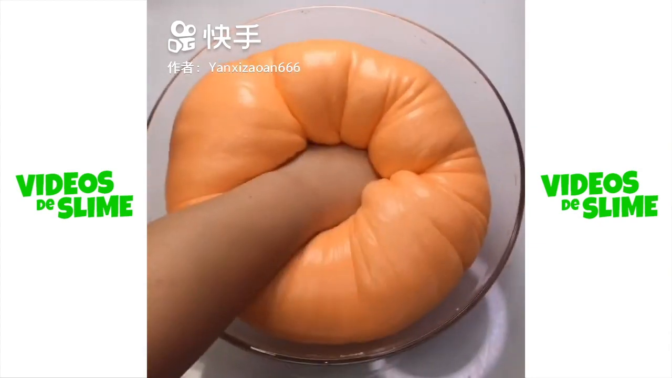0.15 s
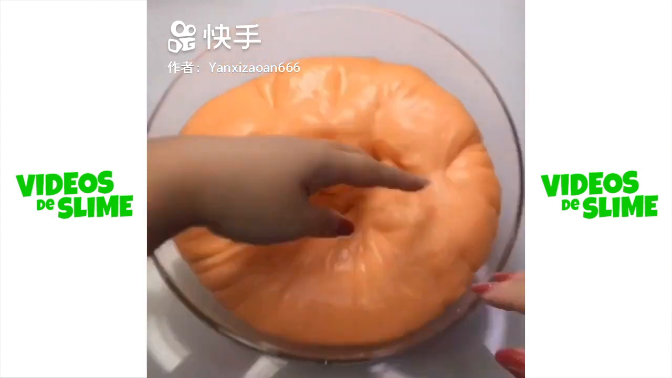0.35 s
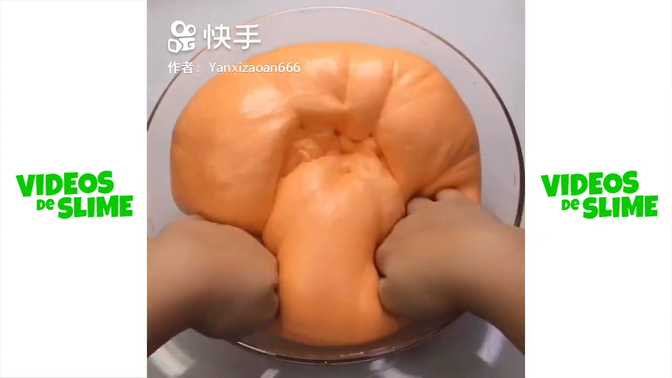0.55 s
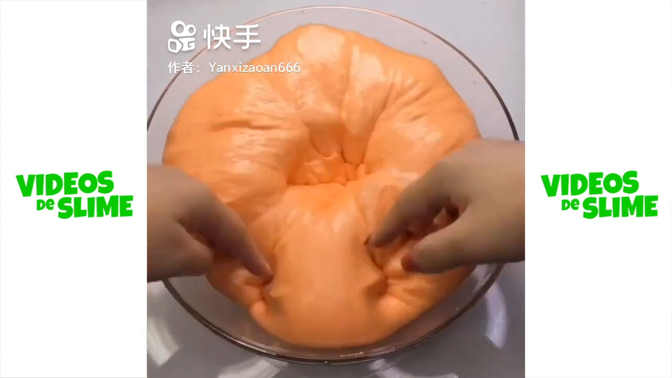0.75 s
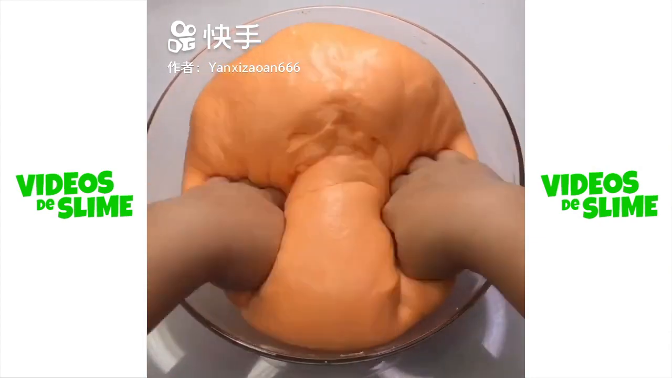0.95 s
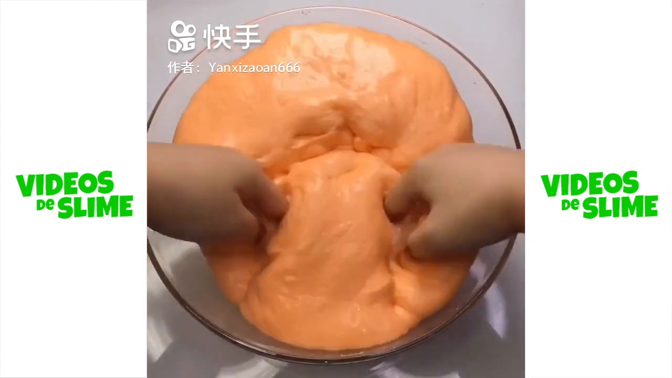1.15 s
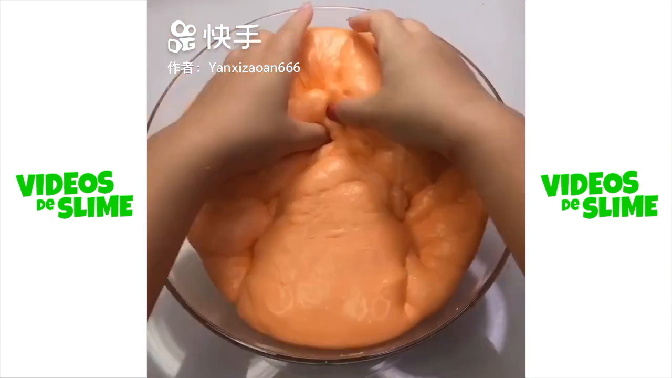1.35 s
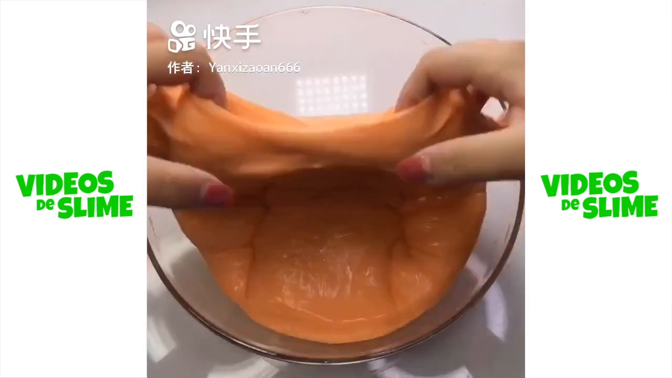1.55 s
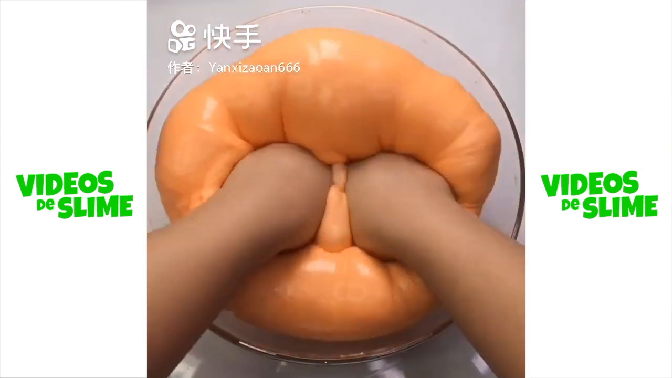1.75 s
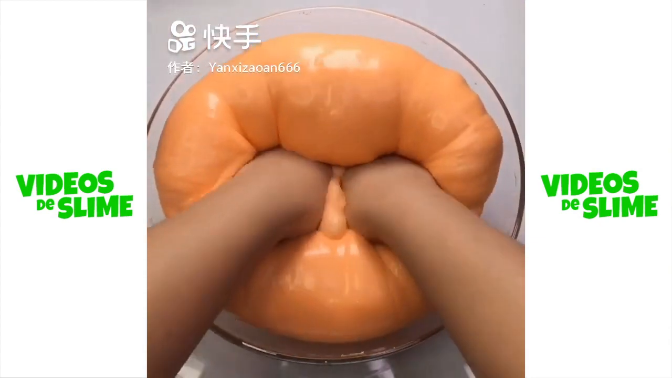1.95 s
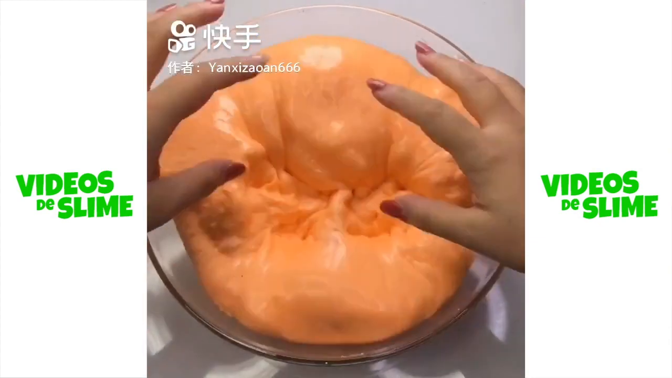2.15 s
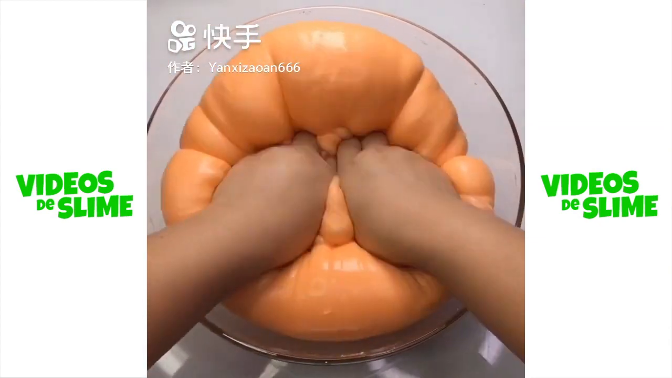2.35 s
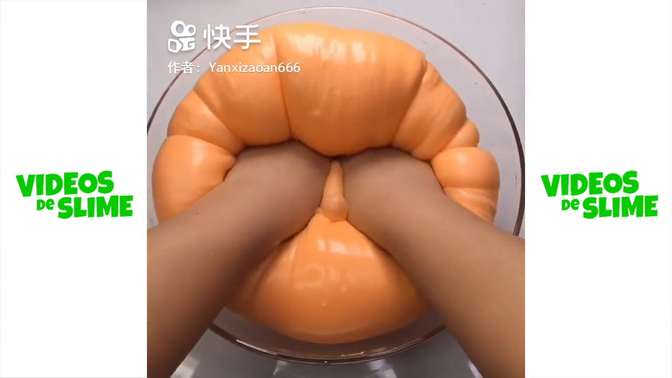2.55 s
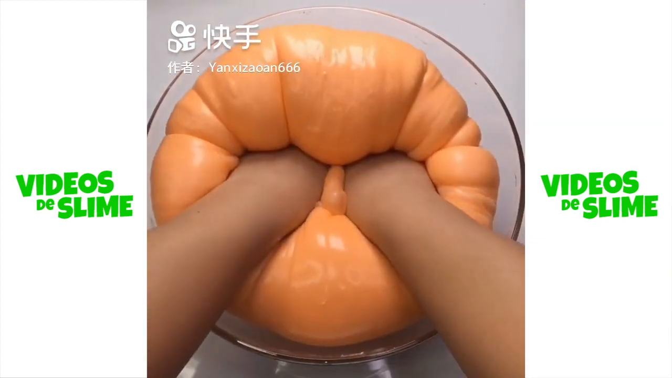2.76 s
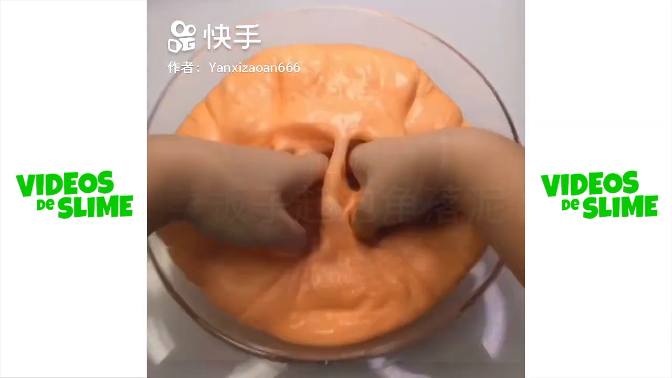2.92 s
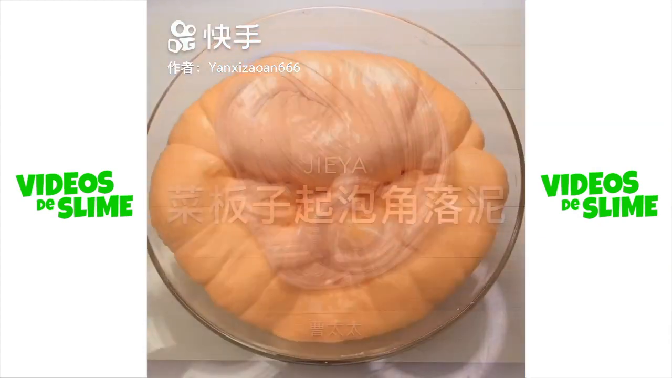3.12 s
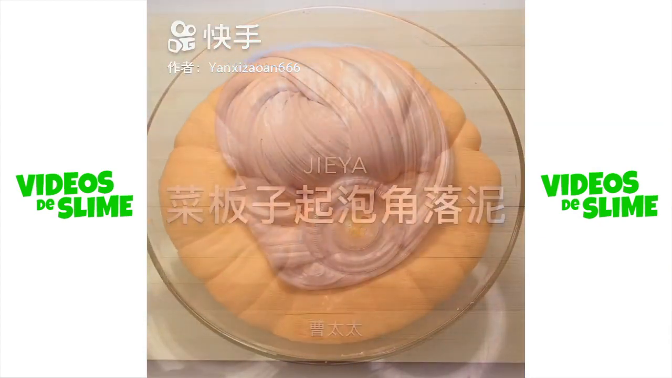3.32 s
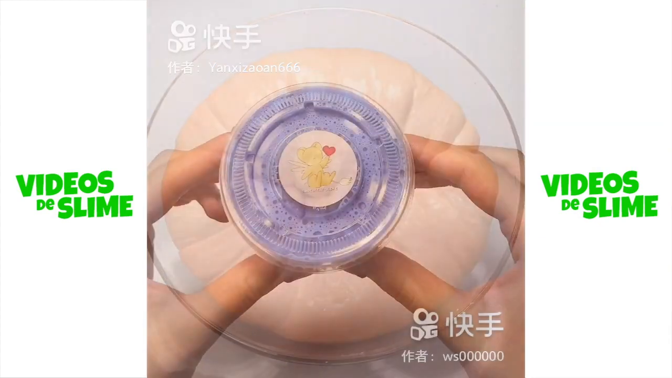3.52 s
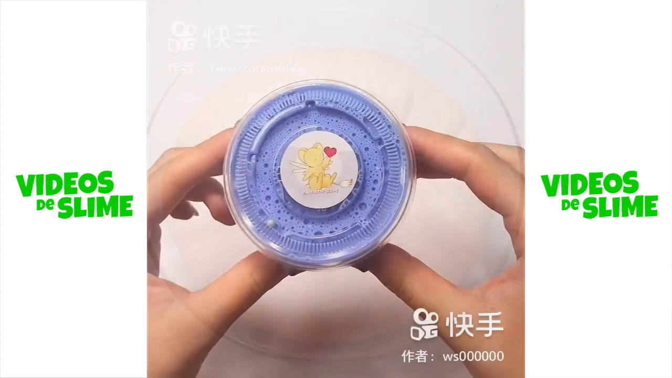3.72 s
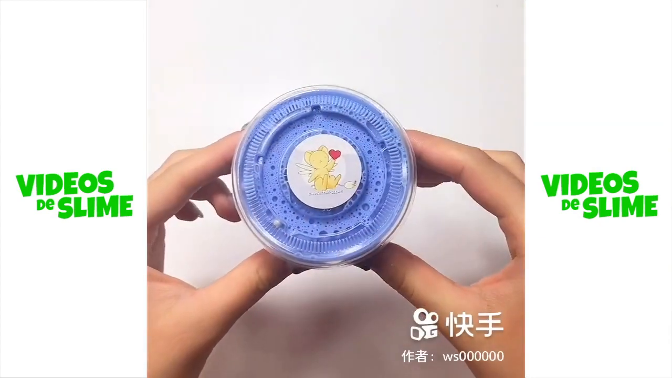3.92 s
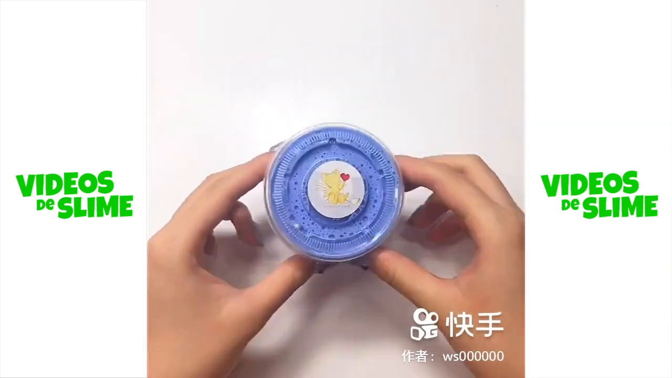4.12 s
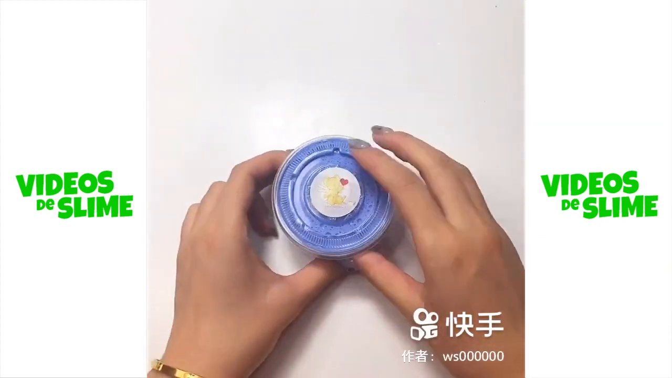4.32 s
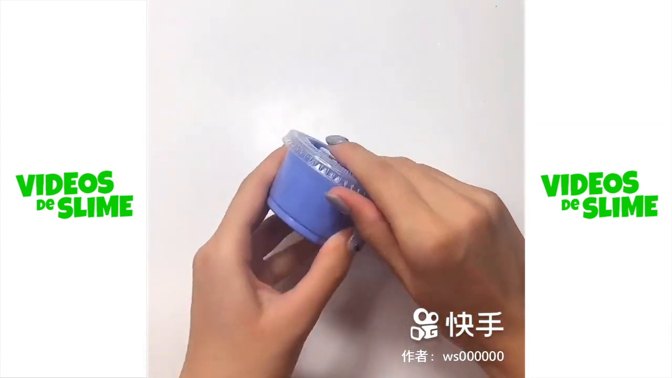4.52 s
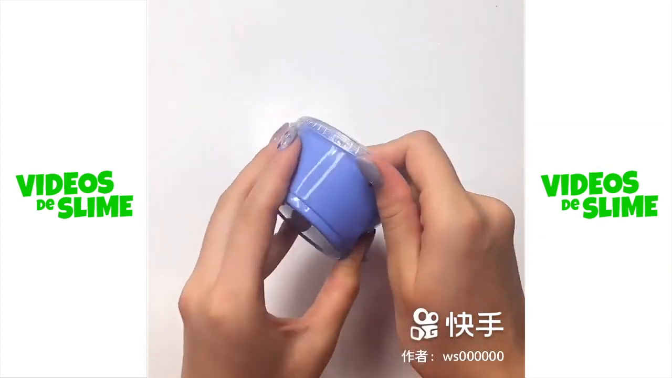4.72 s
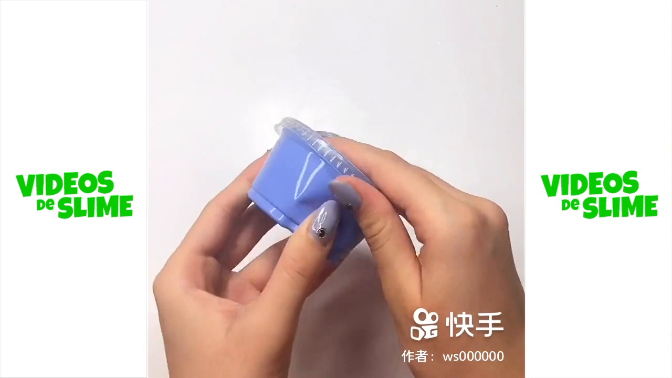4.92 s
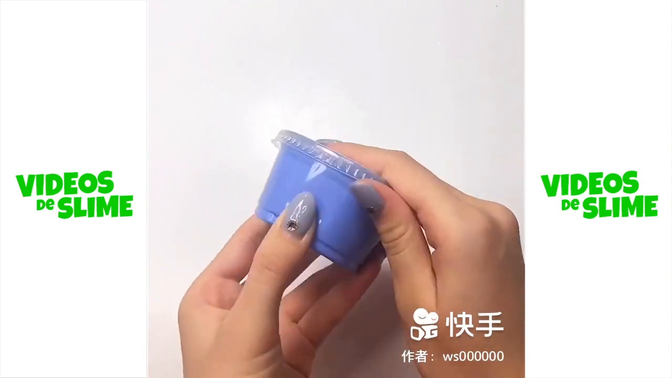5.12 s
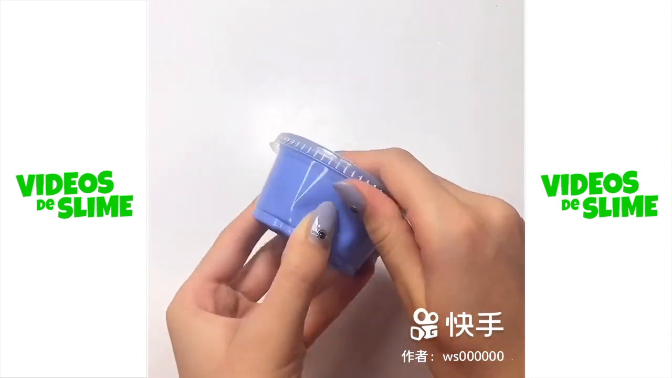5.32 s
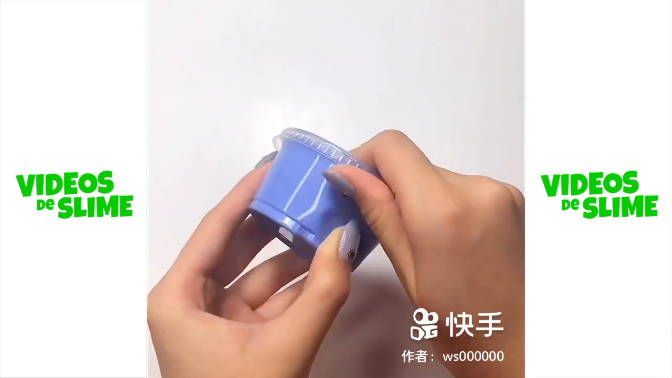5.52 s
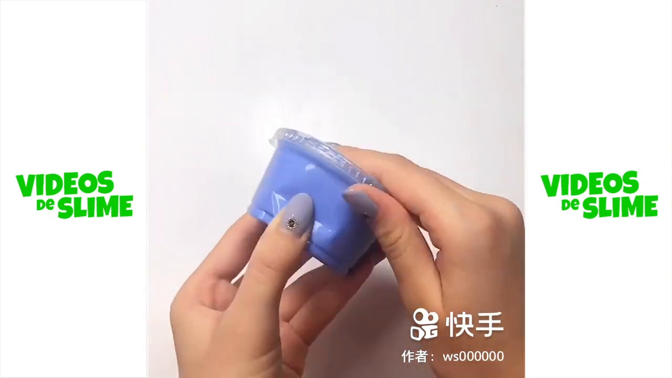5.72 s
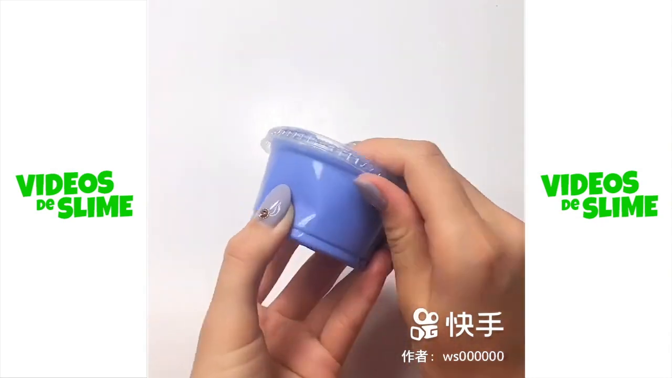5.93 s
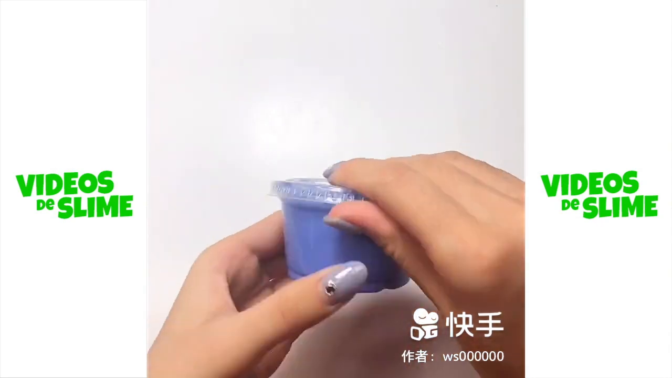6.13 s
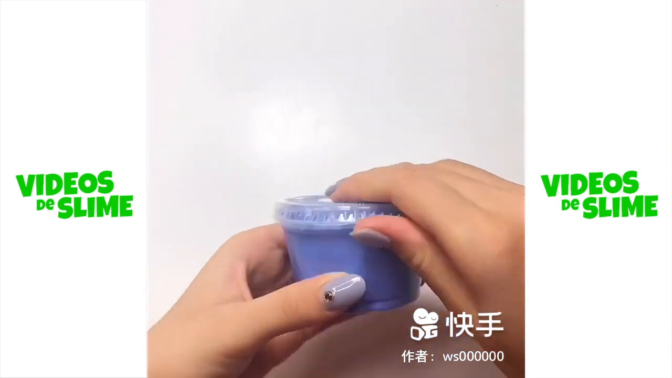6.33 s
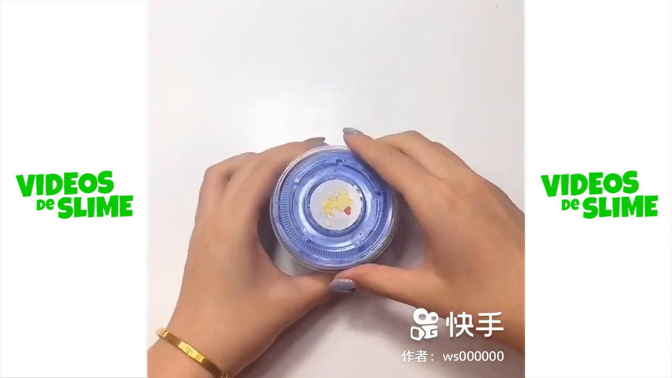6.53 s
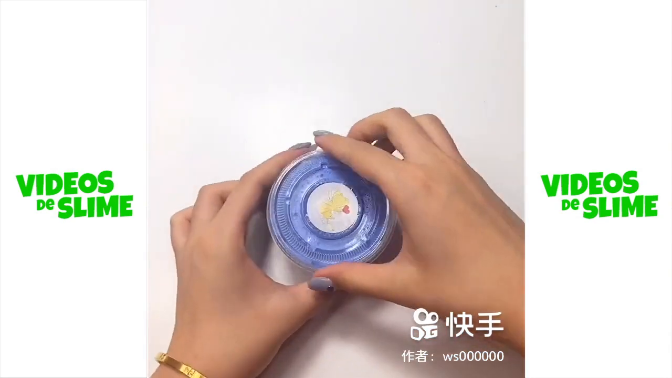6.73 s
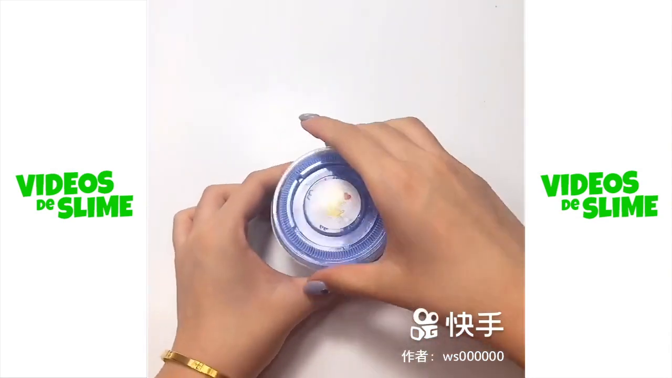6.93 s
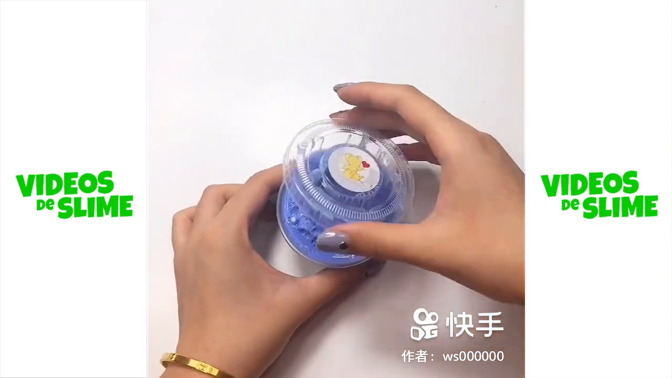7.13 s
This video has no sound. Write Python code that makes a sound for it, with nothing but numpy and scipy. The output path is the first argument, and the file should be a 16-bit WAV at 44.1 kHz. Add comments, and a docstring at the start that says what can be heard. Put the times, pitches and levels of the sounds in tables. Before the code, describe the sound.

Close, dry mono pickup of slime being kneaded in irregular presses, each giving bubbly pops, tearing clicks, soft squish and occasional dull thuds against a full glass bowl. The sound fades out completely for a moment. A second quiet indoor space fades in with slightly stronger low room tone: a small plastic container taps a tabletop, its wall crackles and snaps under fingers, skin rubs and squeaks, and faint ticks accompany final knocks.

```python
"""Hands knead a big lump of slime in a glass bowl: trapped air pops as chirps and noisy tears, sticky skin
crackles in clouds of ringing grains, the mass slaps down in low thuds, and nails tap the glass rim.
After a fade to silence, in another quiet room, a thin plastic tub of slime is knocked on a table, then
turned and squeezed: its wall snaps in noise bursts, skin squeaks in trains of slips, fingers and lid rub
in fine grains. Late on, faint ticks join in and the tub is set down again with low knocks."""
import sys
import numpy as np
from scipy import signal
from scipy.fft import rfft, irfft
from scipy.io import wavfile
from scipy.ndimage import uniform_filter1d

SR = 44100
rng = np.random.default_rng(int(sys.argv[2]) if len(sys.argv) > 2 else 0)


def inscribe(sig):
    """Save sig as 16-bit PCM at rate SR to the path in sys.argv[1].

    A 1-D sig is mono; a 2-D sig holds one channel per row.
    Samples are clipped to [-1, 1] before scaling.
    """
    pcm = np.round(np.clip(np.atleast_2d(sig).T, -1, 1) * 32767)
    wavfile.write(sys.argv[1], SR, pcm.astype(np.int16))


N = 320607
TIME = np.arange(N) / SR
AGE = TIME[:SR // 4]  # time since the start of a short sound, s


def from_db(db):
    """Decibels to gain."""
    return 10 ** (np.asarray(db) / 20)


def rms_one(x):
    """Scale to an rms of 1."""
    return x / np.sqrt(np.mean(x ** 2) + 1e-20)


def burst(x, db):
    """Give a short sound the energy of 5 ms at this rms level."""
    return x * from_db(db) * np.sqrt(.005 * SR / (np.sum(x ** 2) + 1e-20))


def dying(t60):
    """Exponential decay that loses 60 dB in t60 seconds."""
    return from_db(-60 * AGE / max(t60, 1e-3))


def band(x, low_hz, high_hz, order=2):
    """Butterworth band-pass."""
    high = min(high_hz, .47 * SR)
    low = min(low_hz, high / 1.1)
    sos = signal.butter(order, [low, high], "band", fs=SR, output="sos")
    return signal.sosfilt(sos, x + 1e-18)


def ring(x, hz, t60):
    """Two-pole resonator: a unit click sets a decaying sine of height 1 ringing."""
    radius = from_db(-60 / (t60 * SR))
    angle = 2 * np.pi * min(hz, .47 * SR) / SR
    return signal.lfilter([0, np.sin(angle)], [1, -2 * radius * np.cos(angle), radius ** 2], x + 1e-18)


def chirp(start_hz, end_hz, glide_s):
    """A sine whose pitch settles from start to end."""
    pitch_hz = end_hz + (start_hz - end_hz) * np.exp(-AGE / glide_s)
    return np.sin(2 * np.pi * np.cumsum(pitch_hz) / SR)


def add(track, s, sound):
    """Mix a sound in at time s."""
    i = max(round(s * SR), 0)
    track[i:i + len(sound)] += sound[:max(N - i, 0)]


def at_random(from_s, to_s, per_s, count=200):
    """Irregular moments, each with three chance values for its size, brightness and pitch."""
    gaps = rng.gamma(2, .5, count)
    chance = np.clip(rng.standard_normal((count, 3)), -2, 2)
    moments = from_s + np.cumsum(gaps) / per_s
    return [(s, *values) for s, values in zip(moments, chance) if s < to_s]


def pushes(starts, holds, peaks_db, rise, sag, fall, rest_db):
    """Level in dB of a series of pushes: each rises, sags while held and falls away (dB per s) to rest."""
    coarse = TIME[::64]
    age, hold = coarse - starts[:, None], holds[:, None]
    before = rise * np.minimum(age, 0)
    held = sag * np.clip(age, 0, hold)
    after = fall * np.maximum(age - hold, 0)
    loudest_db = (peaks_db[:, None] + before - held - after).max(axis=0)
    # the resting level adds as power
    level_db = 10 * np.log10(from_db(loudest_db) ** 2 + from_db(rest_db) ** 2)
    return np.interp(TIME, coarse, level_db)


def grains(per_s, low_hz, high_hz, cycles, spread_db, tilt_db, count=24):
    """Random tiny bursts of uneven size, each ringing a few cycles at its own pitch; rms 1."""
    sizes = from_db(spread_db * np.minimum(rng.exponential(1, N), 4)) * rng.choice([-1, 1], N)
    clicks = sizes * (rng.random(N) < per_s / SR)
    dealt = rng.integers(0, count, N)  # which pitch each click rings
    cloud = np.zeros(N)
    for k, hz in enumerate(np.geomspace(low_hz, high_hz, count)):
        voice = rms_one(ring(clicks * (dealt == k), hz, cycles / hz))
        cloud += from_db(tilt_db * np.log2(hz / low_hz)) * voice  # tilt in dB per octave
    return rms_one(band(cloud, low_hz * 0.8, high_hz * 3.0))


def crack(hz, t60, width, leak_db=-20, rise=.035, uneven_db=3.5):
    """A noisy tear that runs in uneven jerks and dies quickly, strongest around one pitch."""
    swell = 1 - np.exp(-(AGE + 1 / SR) / max(rise * t60, 1e-5))
    jerks = from_db(uneven_db * rms_one(uniform_filter1d(rng.standard_normal(len(AGE)), size=24)))
    tear = rng.standard_normal(len(AGE)) * jerks * swell * dying(t60)
    spread = max(width, 1.1)
    return band(tear, hz / spread, hz * spread) + from_db(leak_db) * tear


def struck(modes, detune=0.02):
    """The modal ring of a body; grip and contact point change its modes a little from blow to blow."""
    body = np.zeros(len(AGE))
    for k, (hz, db, t60) in enumerate(modes):
        gain = from_db(db + rng.normal(0, 1))
        pitch_hz = hz * (1 + rng.normal(0, detune))
        # neighbouring modes start in opposite directions
        body += (-1) ** k * gain * np.sin(2 * np.pi * pitch_hz * AGE) * dying(t60)
    return body


def blows(rows, modes, start_hz, end_hz, glide_s, t60, rough, lowest_hz):
    """Each blow is a falling chirp with a short clatter, plus the ring of the heavy body beneath."""
    out, swell = np.zeros(N), 1 - np.exp(-AGE / .001)
    for s, thud_db, chirp_db in rows:
        noise = rng.standard_normal(len(AGE))
        clatter = rms_one(band(noise, end_hz * 1.5, start_hz * 0.92)) * dying(t60)
        tone = chirp(start_hz, end_hz * (1 + rng.normal(0, 0.011)), glide_s)
        contact = (tone + rough * clatter) * dying(t60)
        thud = burst(struck(modes) * swell, thud_db)
        add(out, s, thud + burst(contact * swell, chirp_db))
    return band(out, lowest_hz, 6000, order=3)


# the larger air pockets bursting; the pitches are nominal, the cavity glides down through its own:
# start_s, cavity_db, cavity_hz, crack_db, crack_hz, t60_s
POPS = [(0.0465, -39, 1900, -30.5, 6140, .028), (0.0537, -25, 1660, -32, 7040, 0.031),
        (0.059, -19, 1856, -21.5, 9000, 0.018), (0.0946, -34, 1940, -33, 6680, 0.011),
        (0.1116, -37, 1560, -43, 6120, 0.0076), (0.1254, -18.5, 2020, -18, 5850, 0.01),
        (0.1572, -34, 1500, -27.5, 7570, 0.015), (0.2025, -37.5, 1600, -38.5, 5680, 0.019),
        (0.2997, -57, 1240, -54.5, 7120, 0.021), (0.4293, -23, 1755, -18.5, 6500, 0.043),
        (0.4432, -35, 1800, -20, 5910, 0.012), (0.4965, -32, 1390, -37.5, 7020, 0.0082),
        (0.6784, -48.5, 1920, -43, 5670, 0.0071), (0.8123, -52, 2250, -49, 4320, 0.031),
        (0.859, -47, 1680, -30, 7400, .003), (0.8624, -48, 1440, -24.5, 6560, 0.006),
        (0.8748, -25.5, 2560, -24.5, 7640, 0.011), (0.8812, -36, 2290, -32, 9400, 0.033),
        (1.0379, -39.5, 2250, -48, 4590, 0.0048), (1.0475, -30.5, 2160, -63, 5150, .011),
        (1.073, -41.5, 1620, -41.5, 6300, 0.015), (1.2683, -39, 1570, -49, 6440, .007),
        (1.2868, -32.5, 2320, -52, 6540, 0.012), (1.3073, -32.5, 2750, -21, 9800, .025),
        (1.312, -28.5, 1930, -26, 8700, 0.017), (1.3258, -30, 1885, -28.5, 7700, .02),
        (1.4535, -56, 1720, -45.5, 7500, 0.03), (1.4745, -37, 1030, -26, 10200, .02),
        (1.6002, -43.5, 2120, -46, 5560, 0.014), (1.6515, -49, 2240, -44.5, 5940, .045),
        (1.7246, -35, 2090, -26, 5300, 0.0094), (1.7358, -26.5, 1820, -36, 6610, 0.014),
        (1.8019, -43.5, 1420, -40, 6700, 0.01), (1.8398, -50, 1860, -58, 4540, 0.0062),
        (1.861, -35.5, 2160, -37, 6750, 0.029), (1.8812, -36, 2660, -39, 4630, 0.0068),
        (1.9598, -48.5, 1680, -44, 7250, 0.007), (2.0087, -42, 2270, -32.5, 8300, 0.012),
        (2.1135, -32, 1810, -52, 7560, 0.022), (2.1337, -29, 1610, -22, 6300, 0.028),
        (2.3451, -41, 1940, -37.5, 7730, .02), (2.393, -42, 1840, -40.5, 6780, 0.014),
        (2.4341, -41.5, 2260, -34.5, 7930, 0.0084), (2.4555, -41.5, 2500, -44, 5860, .019),
        (2.4936, -35, 2400, -25.5, 7860, 0.012), (2.5046, -33.5, 2580, -29.5, 6110, 0.0035),
        (2.5318, -36, 2140, -28, 5930, 0.0056), (2.5422, -46, 2250, -30, 7040, .01),
        (2.5579, -34, 2020, -24.5, 8400, 0.014), (2.6068, -38.5, 2430, -39, 5170, 0.0069),
        (2.6309, -33.5, 1930, -51.5, 5500, 0.01), (2.636, -20.5, 2104, -33, 5160, 0.016),
        (2.6964, -47, 2560, -45.5, 6800, 0.022), (2.7323, -37.5, 1760, -55, 5900, 0.0094),
        (2.7577, -44, 1540, -54, 5680, 0.014), (2.772, -42, 2200, -67, 4080, 0.0065),
        (2.8028, -44.5, 2350, -58, 4400, 0.0072), (2.839, -48, 1930, -51, 7130, 0.016),
        (3.013, -23.5, 2590, -25, 7000, .013), (3.0142, -17, 1136, -19, 6570, 0.042),
        (3.0896, -46, 2180, -35.5, 5140, 0.0055), (3.1132, -42.5, 2040, -43, 8220, .02)]


def slime_pops(pops, rough=0.99, crack_length=1.0, cavity_length=1.0):
    """The skin of a pocket tears with a crack, and its cavity rings with a falling pitch."""
    out = np.zeros(N)
    for s, cavity_db, cavity_hz, crack_db, crack_hz, t60 in pops:
        cavity_t60 = cavity_length * t60
        glide = chirp(1.618 * cavity_hz, 0.68 * cavity_hz, .15 * t60)
        tone = glide * (dying(cavity_t60) - dying(0.14 * t60))
        breath = crack(0.82 * cavity_hz, cavity_t60, width=1.93, leak_db=-19.5, rise=0.036)
        cavity = burst(tone, 0) + rough * burst(breath, 0)
        tear = crack(0.88 * crack_hz, crack_length * t60, width=1.616, leak_db=-7, rise=0.024)
        add(out, s, burst(cavity, cavity_db) + burst(tear, crack_db))
    return out


# small pockets burst at random, as loud as the bubbling around them allows
SMALL_POPS_PER_S, SMALL_POP_HZ, SMALL_CRACK_HZ, SMALL_POP_T60_S = 28, 1985, 6500, .011
SMALL_CAVITY_DB, SMALL_CRACK_DB = 3, 0.5  # over the bubbling
SMALL_POP_LIMIT_DB = -42  # bubbling level above which they grow no more


def small_pops(bubble_db, spread_db=3, octaves=0.34):
    """Small pockets give way all through the kneading; same columns as POPS."""
    rows = []
    for s, size, bright, pitch in at_random(0, FADE_OUT[0][0], SMALL_POPS_PER_S):
        db = min(bubble_db[int(s * SR)], SMALL_POP_LIMIT_DB) + spread_db * size
        scale = 2 ** (octaves * pitch)
        crack_db = db + SMALL_CRACK_DB + spread_db * bright
        rows.append((s, db + SMALL_CAVITY_DB, SMALL_POP_HZ * scale,
                     crack_db, SMALL_CRACK_HZ * scale, SMALL_POP_T60_S))
    return rows


# the hands press into the slime: start_s, hold_s, squish_db, bubbling_db, sticky_db
PRESSES = [(0.0, 0.0063, -45, -57, -48.5), (0.067, 0.14, -41, -40, -42), (0.439, 0.051, -43.5, -43, -44.5),
           (0.591, 0.18, -53.5, -62.5, -61.5), (0.865, 0.029, -47.5, -49.5, -44),
           (1.029, 0.081, -51.5, -55.5, -57.5), (1.279, 0.061, -45, -49, -43.5),
           (1.46, 0.16, -50.5, -51.5, -55.5), (1.653, 0.017, -59, -50.5, -50.5),
           (1.74, 0.031, -52, -47.5, -42.5), (1.825, 0.097, -48.5, -52, -61),
           (1.953, 0.048, -51.5, -56, -52), (2.123, 0.074, -45, -41.5, -43), (2.332, 0.11, -51, -55, -56),
           (2.462, 0.028, -55, -53, -50), (2.545, 0.038, -50.5, -50, -45), (2.65, 0.26, -57.5, -55, -64.5),
           (3.022, 0.074, -41.5, -39, -39.5)]
PRESS_RISE_DB_PER_S, PRESS_SAG_DB_PER_S = 519.5, 50.5


def press_levels():
    """Levels of squish, bubbling and sticky crackle under the presses; the heavy mass settles last."""
    s, hold, squish_db, bubble_db, sticky_db = np.transpose(PRESSES)
    rise, sag = PRESS_RISE_DB_PER_S, PRESS_SAG_DB_PER_S
    return (pushes(s, hold, squish_db, rise, sag, fall=190, rest_db=-68),
            pushes(s, hold, bubble_db, rise, sag, fall=330, rest_db=-71),
            pushes(s, hold, sticky_db, rise, sag, fall=360, rest_db=-77.5))


def kneading(squish_db, bubble_db, sticky_db):
    """The mass squishes, small bubbles burst inside it, and its skin unsticks from the fingers."""
    squish = grains(900, 90.4, 533, cycles=13, spread_db=4.0, tilt_db=3.0)
    bubbles = grains(750, 650, 3800, cycles=8.4, spread_db=2.0, tilt_db=-1.2)
    sticky = grains(2200, 4200, 18000, cycles=6, spread_db=-0.5, tilt_db=1.5)
    return from_db(squish_db) * squish + from_db(bubble_db) * bubbles + from_db(sticky_db) * sticky


# slime pressed against the bowl: start_s, thud_db, plop_db
SLAPS = [(0.060, -29, -26.5), (0.126, -43, -40), (0.157, -43, -34.5), (0.432, -27, -25), (0.497, -40, -42),
         (0.876, -53, -34), (1.074, -39, -67), (1.31, -39.5, -44), (1.736, -46.5, -36.5), (1.77, -39, -56),
         (1.826, -35, -42), (1.96, -39, -52), (2.137, -30, -32), (2.638, -45, -32.5), (3.0155, -28, -12),
         (3.034, -32.5, -43)]
# modes of the bowl full of slime: pitch_hz, level_db, t60_s
BOWL = [(87, -8, 0.27), (117, -8, 0.17), (166.3, -6.5, 0.22), (198.7, 1.5, 0.18), (246, -8.5, 0.11),
        (434, -0.5, 0.17), (1034, -7.5, 0.1), (1400, -13, 0.14)]


def slaps():
    """The mass thuds on the full bowl, and air trapped under it leaves with a hollow plop."""
    return blows(SLAPS, BOWL, start_hz=1500, end_hz=432.0, glide_s=.0013, t60=0.039, rough=1.0, lowest_hz=62)


# fingernails touching the rim of the bowl: start_s, level_db
NAILS = [(1.45, -41), (1.463, -48), (1.472, -36), (1.537, -50)]
# modes of the glass rim: pitch_hz, level_db, t60_s
RIM = [(2930, -9, 0.067), (4200, -5, 0.092), (5540, 4, 0.054), (7200, 4, 0.073), (8600, -2, 0.1),
       (10500, 0, 0.068)]


def rim_taps():
    """Nails make the glass ring; the slime inside damps it quickly."""
    out = np.zeros(N)
    for s, db in NAILS:
        add(out, s, burst(struck(RIM, detune=0.0088), db))
    return out


# snaps and taps of the plastic tub, with nominal levels and decays:
# start_s, wall_db, wall_hz, crack_db, crack_hz, t60_s
SNAPS = [(4.2393, -46.5, 2700, -49, 8550, 0.0056), (4.2765, -54, 2790, -49, 9240, 0.0068),
         (4.346, -38, 2060, -20, 5800, 0.032), (4.3645, -39, 2690, -30, 5850, 0.038),
         (4.3866, -45, 2230, -27, 5600, 0.047), (4.399, -55, 2400, -32, 13500, .02),
         (4.4065, -50, 1040, -38, 7100, 0.037), (4.4605, -25.5, 2300, -21.5, 5400, 0.044),
         (4.5122, -34.5, 3040, -42, 6370, 0.027), (4.5259, -49, 2670, -33, 6560, 0.012),
         (4.555, -67, 2400, -32.5, 13100, 0.021), (4.6448, -52, 1870, -42.5, 10250, 0.021),
         (4.7838, -42, 2400, -36, 8600, 0.0077), (4.8527, -40, 2740, -30, 6720, 0.0032),
         (4.8568, -36, 2760, -22, 8100, 0.0012), (4.8608, -31, 2650, -29, 8630, .007),
         (4.874, -39, 1450, -21.5, 11700, 0.018), (4.9088, -44, 2540, -37, 6680, .006),
         (4.9318, -44, 2060, -24, 7040, 0.0096), (4.9607, -40.5, 2070, -33.5, 5100, 0.028),
         (5.1081, -33, 1880, -17, 7950, 0.011), (5.1828, -44, 2460, -33, 6130, 0.016),
         (5.1993, -39, 2450, -25, 11700, 0.0097), (5.2651, -56, 1710, -45, 5770, 0.0099),
         (5.2738, -57, 1960, -41, 5440, 0.012), (5.3034, -44, 1810, -39, 5500, 0.016),
         (5.4304, -49, 2870, -36.5, 7900, 0.04), (5.7118, -52, 2100, -21.5, 9600, 0.014),
         (5.89, -30.5, 2290, -21.5, 10800, .006), (5.9916, -60, 2650, -41, 5440, .019),
         (6.042, -49.5, 2960, -50, 5600, .02), (6.0815, -30, 2840, -22, 11400, 0.015),
         (6.1376, -58, 2920, -30, 6700, 0.0049), (6.2136, -37.5, 2930, -33.5, 7000, 0.011),
         (6.245, -47, 2140, -35, 13000, 0.014), (6.252, -47.5, 2640, -34, 12800, 0.013),
         (6.3492, -42, 3030, -44, 8950, 0.0093), (6.5129, -30.5, 3120, -33.5, 8600, 0.026),
         (6.5496, -39, 3200, -32.5, 6900, 0.0076), (6.5731, -33.5, 3140, -25.5, 7200, .011),
         (6.589, -41, 2860, -40, 7800, 0.0068), (6.6603, -40, 1040, -31, 6000, 0.016),
         (6.665, -45, 950, -22, 5200, 0.036), (6.683, -33, 1670, -36, 5500, 0.039),
         (6.7022, -28.5, 2020, -31.5, 5000, .036), (6.728, -41, 1900, -51, 5000, .014),
         (6.8017, -46, 1960, -40, 5100, 0.051), (7.0178, -41, 2480, -24, 5540, 0.038),
         (7.107, -37, 1600, -30, 7000, 0.034), (7.1437, -48, 2800, -42, 5960, 0.0048),
         (7.1865, -46.5, 2740, -49, 6600, 0.012), (7.2547, -39, 2750, -46, 6520, 0.037),
         (7.2674, -37, 2710, -36, 6360, 0.021)]
# modes of the tub's shell: pitch_hz, level_db, t60_s
TUB = [(560, -11, 0.035), (724, -4, 0.11), (1060, -10, 0.062), (1550, -39, .08), (2440, -2, 0.03),
       (3495, -2.5, 0.052), (3970, -21, .06), (4536, 8.5, 0.038), (5300, 9, 0.01), (5600, 15, 0.021),
       (6560, 11, 0.026), (7360, -26, 0.037)]
# the peel's hiss grows steeply with the snap: PEEL_DB at a hard snap, PEEL_GROWTH dB per dB around it
HARD_SNAP_DB, PEEL_DB, PEEL_GROWTH = -19.5, -24, 3.2
PEEL_DELAY_S, PEEL_HZ, PEEL_T60_S = 0.0074, 9300, .064


def tub_snaps(snaps, shell_db=-4, wall_length=0.92, crack_length=0.94, puff_db=-24, puff_hz=500):
    """The wall buckles with a snap and a puff of air, then slime peels off; long, dull ones ring the shell."""
    out = np.zeros(N)
    for s, wall_db, wall_hz, crack_db, crack_hz, t60 in snaps:
        # 1 for a long, dull contact, near 0 for a short, bright one
        coupling = min(t60 / 0.02, 1) * min(6000 / crack_hz, 1) ** 2
        buckle = crack(wall_hz, wall_length * t60, width=1.84, leak_db=-19.0, rise=0.1)
        wall = burst(buckle, wall_db)
        tear = crack(crack_hz, crack_length * t60, width=1.85, leak_db=-14.5, rise=0.085)
        snap = burst(tear, crack_db - 3 * coupling)
        click = 1.0 * (AGE == 0)
        puff = burst(band(click, 36, puff_hz, order=1), crack_db + puff_db)
        shell = coupling * burst(struck(TUB, detune=.014), crack_db + shell_db)
        hiss = crack(PEEL_HZ, PEEL_T60_S, width=2.46, leak_db=-15.5, rise=0.052)
        peel = (1 - coupling) * burst(hiss, PEEL_DB + PEEL_GROWTH * (crack_db - HARD_SNAP_DB))
        add(out, s, wall + snap + puff + shell)
        add(out, s + PEEL_DELAY_S, peel)
    return out


# faint ticks come at random while the grip slides; their levels are over the hiss of the rubbing
HANDLED_FROM_S, TICKS_PER_S, TICK_WALL_DB, TICK_CRACK_DB = 6.5, 26, -6, 2
TICK_WALL_HZ, TICK_HZ, TICK_T60_S = 2400, 6400, 0.0072


def ticks(hiss_db, spread_db=3, octaves=0.36):
    """The tub ticks faintly as the grip shifts; same columns as SNAPS."""
    rows = []
    for s, size, bright, pitch in at_random(HANDLED_FROM_S, TIME[-1], TICKS_PER_S):
        db, scale = hiss_db[int(s * SR)], 2 ** (octaves * pitch)
        wall_db = db + TICK_WALL_DB + spread_db * size
        crack_db = db + TICK_CRACK_DB + spread_db * bright
        rows.append((s, wall_db, TICK_WALL_HZ * scale, crack_db, TICK_HZ * scale, TICK_T60_S))
    return rows


# tub meeting the table: start_s, thud_db, knock_db
KNOCKS = [(3.99, -45, -55), (4.358, -26.5, -32), (4.409, -25, -28), (4.461, -32, -36), (4.512, -46, -40.5),
          (5.109, -74, -64), (5.304, -84, -43), (6.561, -39, -59), (6.661, -20, -24), (6.666, -48, -30),
          (6.702, -36.5, -34), (7.02, -40, -50), (7.109, -43.5, -41.5)]
# modes of the table top: pitch_hz, level_db, t60_s
TABLE = [(97, -14.5, 0.22), (128.5, -6, 0.15), (164, -4.5, 0.077), (232.4, -3.5, 0.14), (357, -27, 0.074),
         (525, 1.5, 0.053), (660, -30, 0.046)]


def knocks():
    """The table top thuds; its bending waves carry the highs ahead of the lows, heard as a falling chirp."""
    return blows(KNOCKS, TABLE, start_hz=1117, end_hz=152, glide_s=0.0091, t60=0.062, rough=1.0,
                 lowest_hz=82.6)


# fingers and lid slide over the tub: start_s, length_s, scrape_db, hiss_db
STROKES = [(3.813, 0.052, -60, -63.5), (4.514, 0.027, -54, -47), (4.611, 0.032, -59, -51),
           (4.705, 0.039, -54.5, -48.5), (4.844, 0.089, -66, -55), (5, 0.013, -70, -43),
           (5.052, 0.032, -77, -52), (5.132, .03, -68, -48), (5.23, 0.053, -63, -59),
           (5.432, 0.019, -67, -45.5), (5.508, 0.073, -63, -46.5), (5.617, 0.0087, -57, -45),
           (5.779, .06, -62, -48), (5.967, 0.0092, -53.5, -52), (6.292, 0.008, -55, -49),
           (6.391, 0.011, -55, -43.5), (6.461, 0.16, -56.5, -47.5), (6.748, 0.083, -54, -62),
           (6.861, 0.058, -62, -50.5), (7.092, 0.056, -53.5, -55), (7.256, .02, -58, -49.5)]
STROKE_RISE_DB_PER_S, STROKE_SAG_DB_PER_S = 1100, 38


def stroke_levels():
    """Levels of scrape and hiss under the sliding fingers and lid."""
    s, length, scrape_db, hiss_db = np.transpose(STROKES)
    rise, sag = STROKE_RISE_DB_PER_S, STROKE_SAG_DB_PER_S
    return (pushes(s, length, scrape_db, rise, sag, fall=570, rest_db=-73.5),
            pushes(s, length, hiss_db, rise, sag, fall=450, rest_db=-68.5))


def rubbing(scrape_db, hiss_db):
    """Skin and lid stick and slip over the plastic in very many tiny steps."""
    scrape = grains(1300, 580, 3480, cycles=9.1, spread_db=2.0, tilt_db=5.4)
    hiss = grains(4500, 3960, 15800, cycles=9.4, spread_db=1.0, tilt_db=2.3)
    return from_db(scrape_db) * scrape + from_db(hiss_db) * hiss


# a thumb squeaking over the tub: start_s, length_s, level_db, slips_per_s (average before jitter)
SQUEAKS = [(5.07, 0.011, -45, 830), (5.613, 0.018, -38.5, 980), (5.955, 0.02, -31, 500)]


def squeaks(wall_hz=5300, wall_t60=0.0046, overtone=0.18):
    """Skin sticks and slips in a quick, growing train; each slip rings the wall."""
    out = np.zeros(N)
    for s, length, db, per_s in SQUEAKS:
        turns = np.cumsum(per_s * (1 + 1.6 * rng.standard_normal(len(AGE)))) / SR
        # one slip each time the jittery count passes a whole number
        steps = np.diff(np.maximum.accumulate(np.floor(turns)), prepend=0)
        slips = steps * (AGE < length) * (.3 + AGE / length)
        wall = ring(slips, wall_hz, wall_t60) + overtone * ring(slips, 2.1 * wall_hz, wall_t60 / 2)
        add(out, s, burst(wall, db))
    return out


def room(x, delay_s, early_t60, early_db, late_t60, late_db, top_hz):
    """Near walls answer in a quick bright cluster; a duller tail rings on longer."""
    early, late = rng.standard_normal((2, len(AGE)))
    cluster = band(early * dying(early_t60), 300, 11000, order=1)
    tail = band(late * dying(late_t60), 120, top_hz, order=1)
    echoes = (from_db(early_db) * cluster / np.linalg.norm(cluster)
              + from_db(late_db) * tail / np.linalg.norm(tail))
    delayed = np.pad(echoes, (max(round(delay_s * SR), 0), 0))
    return x + signal.fftconvolve(x, delayed)[:N]


# background air of the two rooms, relative spectrum: pitch_hz, level_db (per Hz)
BOWL_AIR = [(18, -47), (30, -17), (95, 5), (364, -4.5), (437, -2), (866, -7.5), (2060, -14), (3060, -18.5),
            (5040, -16), (14800, -24.5), (16000, -29)]
TUB_AIR = [(18, -62), (30, -41), (95, -20.5), (134, 2), (179, -15.5), (210, -8), (295, -11), (355, -5.5),
           (394, -11.5), (569, -9), (1100, -19), (1720, -24), (2830, -27), (3770, -31), (16000, -48)]
BOWL_AIR_DB, TUB_AIR_DB = -66.5, -57  # rms


def air(spectrum, db):
    """Steady room noise, coloured by a spectrum drawn over log frequency."""
    hz, level_db = np.transpose(spectrum)
    bins_hz = np.fft.rfftfreq(N, 1 / SR)
    colour = from_db(np.interp(np.log(bins_hz + 1), np.log(hz), level_db))
    return from_db(db) * rms_one(irfft(rfft(rng.standard_normal(N)) * colour, N))


def fade(rows):
    """Straight gain ramps between points, sample by sample."""
    s, gain = np.transpose(rows)
    return np.interp(TIME, s, gain)


# fades of the bowl and of the tub: time_s, gain (plain factor)
FADE_OUT = [(3.33, 1), (3.37, 0)]
FADE_IN = [(3.51, 0), (3.64, .8), (3.95, 1)]


def scene():
    """The bowl fades out, the tub fades in; each sounds in its own room."""
    squish_db, bubble_db, sticky_db = press_levels()
    pops = slime_pops(POPS + small_pops(bubble_db))
    slime = pops + kneading(squish_db, bubble_db, sticky_db) + rim_taps() + slaps()
    scrape_db, hiss_db = stroke_levels()
    snaps = tub_snaps(SNAPS + ticks(hiss_db))
    tub = snaps + rubbing(scrape_db, hiss_db) + squeaks() + knocks()
    first = room(slime, delay_s=0.0022, early_t60=0.067, early_db=-18.5,
                 late_t60=0.15, late_db=-17.5, top_hz=7000) + air(BOWL_AIR, BOWL_AIR_DB)
    second = room(tub, delay_s=.0062, early_t60=0.089, early_db=-17,
                  late_t60=0.31, late_db=-21.5, top_hz=9100) + air(TUB_AIR, TUB_AIR_DB)
    return np.array([first * fade(FADE_OUT) + second * fade(FADE_IN)])


CUTOFF_HZ = 16300


def record(dry, top=0.36):
    """Peaks are rounded off softly and everything above the cutoff is removed."""
    rounded = top * np.tanh(dry / top)
    return signal.sosfilt(signal.ellip(10, .1, 80, CUTOFF_HZ, fs=SR, output="sos"), rounded)


dry = scene()
out = record(dry)
inscribe(out)
```